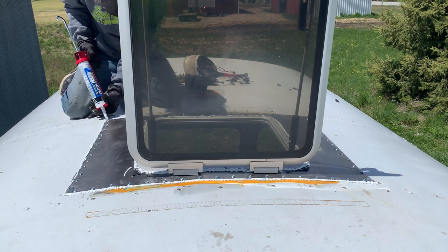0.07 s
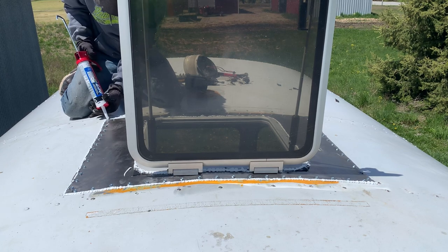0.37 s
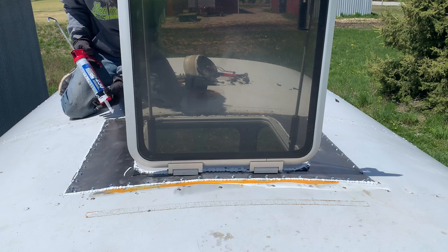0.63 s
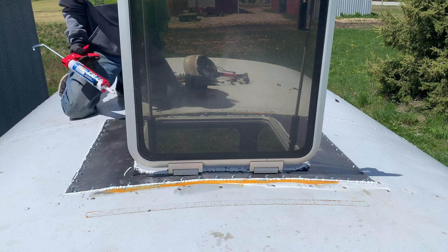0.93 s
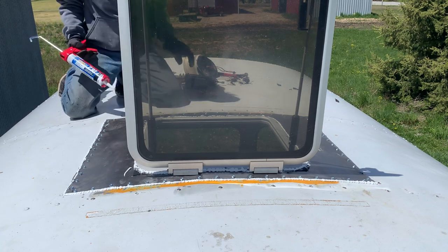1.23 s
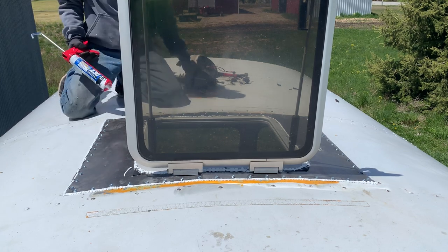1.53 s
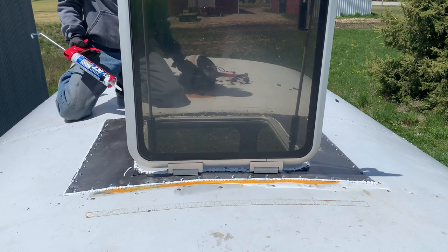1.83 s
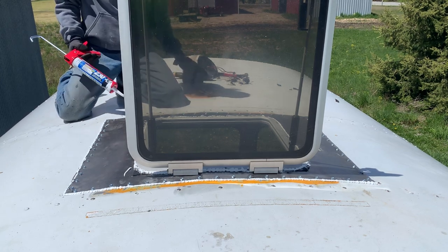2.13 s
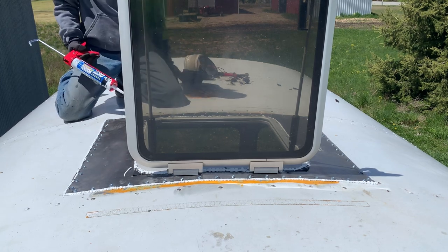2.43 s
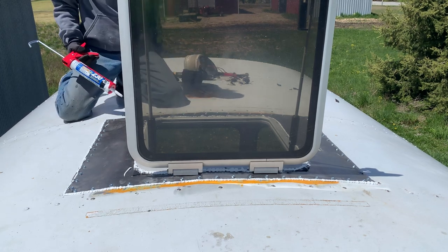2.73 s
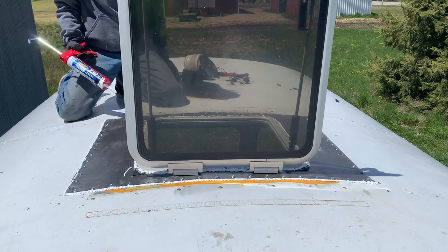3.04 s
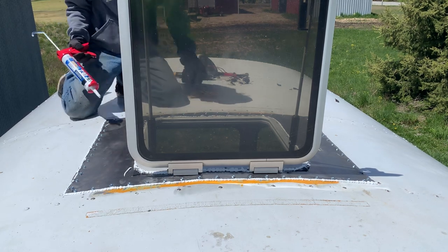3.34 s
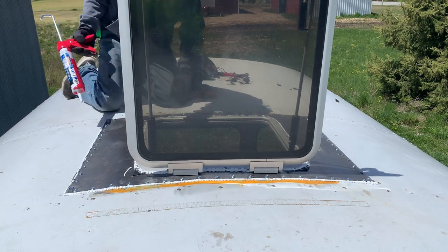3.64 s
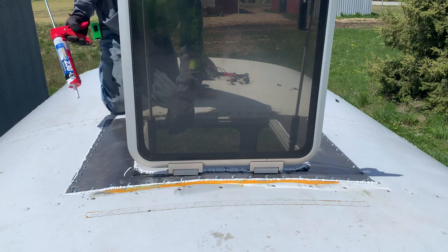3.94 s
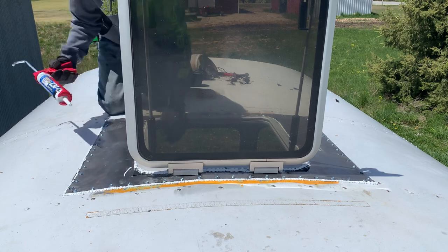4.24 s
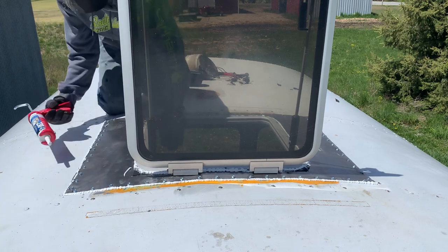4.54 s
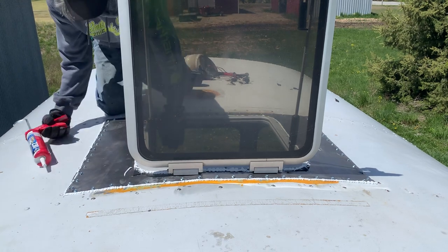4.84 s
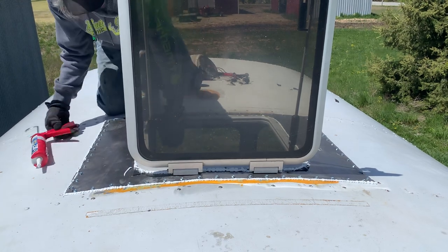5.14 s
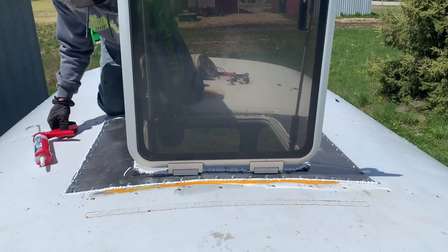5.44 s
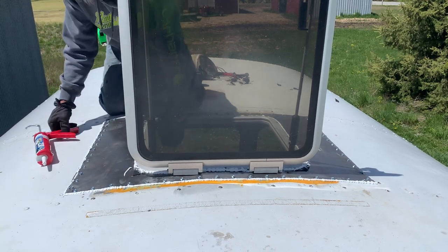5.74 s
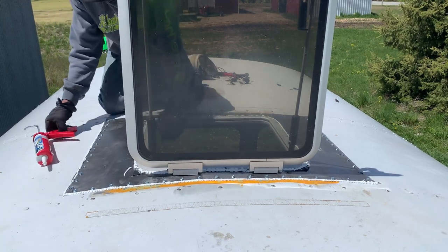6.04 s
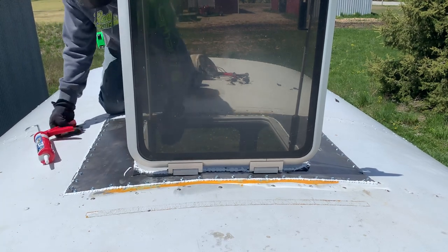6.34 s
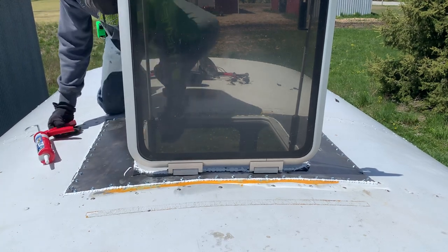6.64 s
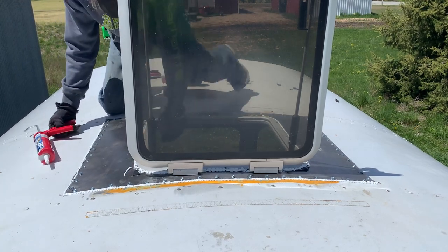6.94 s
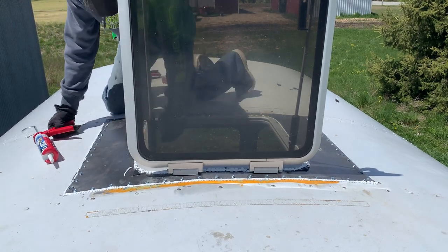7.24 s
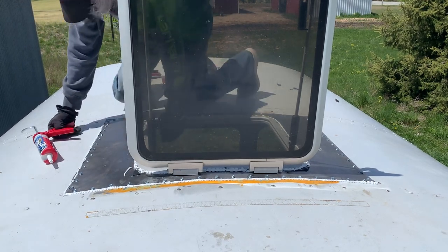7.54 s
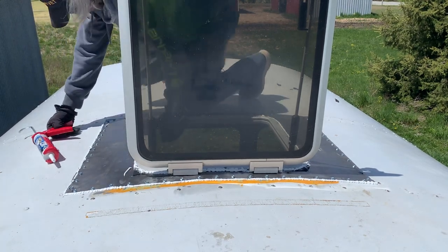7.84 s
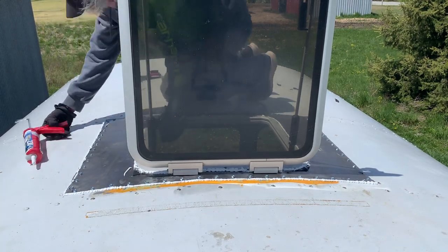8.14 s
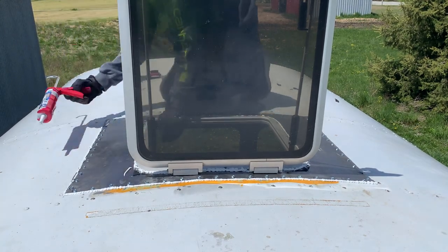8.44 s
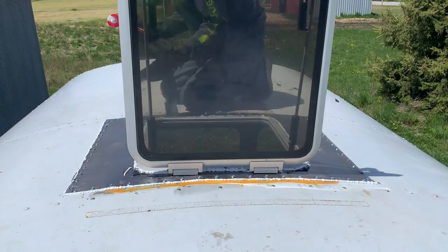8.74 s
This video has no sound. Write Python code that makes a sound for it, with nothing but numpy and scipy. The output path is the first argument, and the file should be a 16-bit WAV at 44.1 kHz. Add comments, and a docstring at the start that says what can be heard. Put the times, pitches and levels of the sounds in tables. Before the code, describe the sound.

A hand rubs a sheet-metal roof, knees thump on it, and a caulking gun clatters down, with faint birds outdoors.

```python
"""A hand rubs back and forth on a curved sheet-metal roof, hissing and setting the sheet humming.
Outdoors, a closely spaced microphone pair near the work. The person kneeling there shifts along:
knees and boots make the roof boom, panels flex and snap, legs drag and work clothes rustle.
A caulking gun clatters down on the sheet, its steel frame ringing and its loose rod ticking.
Far off, birds call among trees and a faint rush swells and fades."""
import sys
import numpy as np
from scipy import signal
from scipy.fft import rfft, irfft, next_fast_len
from scipy.io import wavfile

SR = 44100
rng = np.random.default_rng(int(sys.argv[2]) if len(sys.argv) > 2 else 0)


def dump(signal):
    """Clip the signal to [-1, 1] and save it as 16-bit WAV at the path in sys.argv[1]."""
    limited = np.clip(np.atleast_2d(signal).T, -1, 1)
    pcm = np.round(limited * 32767).astype(np.int16)
    wavfile.write(sys.argv[1], SR, pcm)


N = 392049
TIME = np.arange(N) / SR

# The hand pulls and pushes in turn. Each row: start and end in seconds, hiss in dB,
# tilt in dB per octave, hum in dB.
STROKES = [(-.28, .03, -42, 1.2, -33), (0.028, 0.338, -39.5, 1.4, -33), (0.341, 0.653, -40, 1.4, -37.5),
           (.645, 0.951, -39.5, 1.5, -32), (0.953, 1.269, -40.5, 1.24, -37), (1.264, 1.568, -39.5, 1, -32),
           (1.57, 2.018, -40.5, 1.2, -34.5)]
# Colour of sliding on the sheet. Each row: frequency in Hz, density in dB.
FRICTION = [(100, -16), (350, 8), (600, 1), (1000, -1), (2000, -3), (2900, -11.5), (4500, -13), (6000, -18),
            (7500, -17.5), (11000, -20), (13500, -12.5), (16000, -28.5)]
# The caulking gun hits the roof. Each row: time in seconds, boom in dB, contact cut-off in Hz, extra bass
# in dB, panel pitch in Hz, click in dB, click tilt in dB per octave, frame's favoured pitch in Hz.
KNOCKS = [(4.840, -19, 1320, -6, 438, -22, 3.5, 4540), (4.931, -26.5, 740, -1.5, 414, -28.5, 1, 3320),
          (4.998, -25, 740, -2.5, 220, -29.5, 2, 3300), (5.093, -19.5, 800, -7.5, 580, -22, 4.5, 3500),
          (5.205, -25, 800, 0, 330, -33, 0, 3800), (8.443, -44.5, 905, -1, 490, -50.5, -11, 3400)]


def from_db(db):
    """Decibels to gain."""
    return 10 ** (np.asarray(db) / 20)


def rms_one(x):
    """Scale to unit rms."""
    return x / np.sqrt(np.mean(x ** 2) + 1e-20)


def at_hz(points, hz):
    """Read a table on a log-frequency axis."""
    f, value = np.transpose(points)
    return np.interp(np.log(np.maximum(hz, 1)), np.log(f), value)


def bump(hz, centre_hz, octaves):
    """A bell curve of height 1 around a pitch."""
    return np.exp(-(np.log2(hz / centre_hz) / octaves) ** 2)


def add(out, s, sound):
    """Mix a sound in from s seconds on."""
    start = round(s * SR)
    first, last = max(start, 0), min(start + sound.shape[-1], N)
    out[:, first:last] += sound[..., first - start:last - start]


def noise(colour, size, tilt=0):
    """Two unrelated noises (shared and scattered sound), rms 1; tilt is dB per octave above 500 Hz."""
    padded = next_fast_len(size)
    hz = np.maximum(np.fft.rfftfreq(padded, 1 / SR), 1)
    gain = from_db(at_hz(colour, hz) + tilt * np.log2(np.maximum(hz, 500) / 500)) * (hz > 15)
    return rms_one(irfft(rfft(rng.standard_normal((2, padded))) * gain, padded)[:, :size])


def drift(rate, size):
    """A random wander with `rate` turns a second, spread near 1."""
    knots = rng.standard_normal(int(size / SR * rate) + 2)
    return np.interp(np.arange(size) / SR * rate, np.arange(len(knots)), knots)


def stroke_speed(size):
    """The hand picks up speed quickly, levels off in mid-stroke and slows."""
    return np.tanh(1.25 * np.abs(np.sin(np.linspace(0, np.pi, size))))


def limb_speed(size):
    """A limb eases into a move and out of it."""
    return np.sin(np.linspace(0, np.pi, size)) ** 2


def sliding(moves, speed_curve, colour, grit_db, uneven_db, swell, dull_db, dull_hz):
    """Sliding contact: the hiss grows louder and brighter with speed."""
    out = np.zeros((2, N))
    for start, end, db, tilt, *_ in moves:
        size = round((end - start) * SR)
        speed = speed_curve(size)
        hiss = noise(colour, size, tilt)
        hiss *= from_db(grit_db * drift(400, size) + uneven_db * drift(49.1, size))
        dull = from_db(dull_db) * signal.sosfilt(signal.butter(2, dull_hz, fs=SR, output="sos"), hiss)
        creeping = (1 - speed) * np.minimum(speed * 10, 1)
        add(out, start, from_db(db) * (hiss * speed ** swell + dull * creeping))
    return out


def rubbing_hand():
    """Friction under the hand gives an even hiss on each stroke."""
    return sliding(STROKES, stroke_speed, FRICTION,
                   grit_db=0.5, uneven_db=1, swell=1.25, dull_db=-7.5, dull_hz=2780)


def sheet_hum(t60=0.3):
    """Each stroke sets the sheet humming, and the hum lingers; body weight makes it rumble."""
    # Colours of hum and rumble. Each row: frequency in Hz, density in dB.
    hum_colour = [(70, -82), (120, -2), (170, 6.5), (270, -0.5), (390, 0.5), (500, -14.5), (900, -20),
                  (2000, -38.5), (5000, -39), (10000, -53)]
    rumble_colour = [(20, -30), (40, 16), (65, 16.5), (110, 15.5), (160, -22), (400, -67.5)]
    # Weight shifting onto the sheet. Each row: time in seconds, rumble in dB.
    weight = [(0, -48.5), (1.4, -56), (1.6, -37), (1.88, -32.5), (2.1, -33), (2.6, -69)]
    drive = np.zeros((1, N))
    for start, end, _, _, db in STROKES:
        add(drive, start, from_db(db) * stroke_speed(round((end - start) * SR)) ** 0.24)
    retained = from_db(-60 / (t60 * SR)) ** 2   # share of energy left after one sample
    hum = np.sqrt(signal.lfilter([1 - retained], [1, -retained], drive ** 2 + 1e-18))
    rumble = from_db(np.interp(TIME, *np.transpose(weight)))
    return hum * noise(hum_colour, N) + rumble * noise(rumble_colour, N)


def open_air(air_db=-50, rush_db=-60, peak_s=3.96, width_s=1.47):
    """Quiet air stirred by a breeze; a far rush, perhaps traffic, swells and fades."""
    # Colours of air and rush. Each row: frequency in Hz, density in dB.
    air_colour = [(15, -46), (25, -23.5), (66, 3), (153, -12.5), (223, -8), (373, -18.5), (516, -19.5),
                  (1160, -31.5), (1890, -41), (2990, -45), (7110, -56), (8140, -58), (11600, -54.5),
                  (16000, -73.5)]
    rush_colour = [(300, -25.5), (600, 4.5), (900, 7), (1300, -4), (2000, -14.5), (4000, -60)]
    breeze = from_db(air_db + 1.5 * drift(6, N)) * noise(air_colour, N)
    swell = 1 / (1 + ((TIME - peak_s) / width_s) ** 2)
    return breeze + from_db(rush_db) * swell * noise(rush_colour, N)


def call_and_squeak_notes(trill_hz=58, chirp_from_hz=2600, twitters_per_s=16, blur=0.025):
    """Yield each note as start in seconds, level in dB, pitch blur in Hz, rasp, pitch track in Hz."""
    # Birds' gliding whistles. Each row: start and length in seconds, first, middle and last pitch in Hz,
    # level in dB, rasp as a share of the pure tone.
    whistles = [(3.877, 0.069, 2090, 2250, 2240, -69, .3), (4.032, 0.067, 2330, 2110, 1950, -72, .3),
                (4.358, 0.15, 2250, 2430, 2740, -67.5, .5), (4.52, 0.15, 2600, 2240, 2080, -66, 0.44),
                (4.672, 0.098, 2150, 2310, 2600, -70, .4), (5.252, .25, 1020, 1179, 1028, -55, 1.5),
                (5.345, 0.12, 2200, 2460, 2870, -65, 0.44), (5.485, 0.15, 2600, 2380, 2170, -71, .4),
                (5.69, 0.049, 2280, 2430, 2650, -72, .4), (6.135, 0.16, 3010, 2350, 2214, -71, 0.63),
                (6.33, 0.04, 2230, 2420, 2800, -69, .4)]
    for start, length, first, middle, last, db, rasp in whistles:
        arc = np.polyfit([-1, 0, 1], [first, middle, last], 2)
        yield start, db, blur * middle, rasp, np.polyval(arc, np.linspace(-1, 1, round(length * SR)))
    # Falling trills. Each row: start and length in seconds, first and last pitch in Hz, level in dB.
    trills = [(6.596, 0.13, 5220, 4470, -70), (6.698, .19, 4410, 4020, -69), (7.6, .19, 6640, 4770, -75),
              (7.778, 0.17, 4440, 4040, -67.5)]
    for start, length, first, last, db in trills:
        t = TIME[:round(length * SR)]
        vibrato = 1 + 0.025 * np.sin(2 * np.pi * trill_hz * t)
        yield start, db, 35, 0, np.geomspace(first, last, len(t)) * vibrato
    # Raspy chirps flick up and hold. Each row: start and length in seconds, top pitch in Hz, level in dB.
    chirps = [(2.441, 0.054, 3750, -63), (3.266, 0.043, 3750, -62), (3.83, 0.048, 4000, -70),
              (5.584, 0.059, 3750, -63), (6.6, 0.037, 3700, -62.5), (7.864, 0.037, 3850, -59),
              (8.556, 0.04, 3750, -63), (8.839, 0.052, 3800, -62)]
    for start, length, hz, db in chirps:
        flick = (chirp_from_hz - hz) * np.exp(-TIME[:round(length * SR)] / 0.009)
        yield start, db, 300, 4, hz + flick
    # Steady calls, a thin squeak and a dragging leg's rasp. Each row: start and end in seconds,
    # pitch in Hz, level in dB, blur in Hz.
    held_notes = [(0.292, 0.352, 1974, -47.5, 58), (2.95, 3.07, 5650, -75.5, 29),
                  (3.112, 3.253, 5600, -80.5, 28), (3.02, 3.093, 2760, -66, 230),
                  (7.745, 7.895, 533.7, -56, 7.9), (7.979, 8.3, 3300, -61, 360),
                  (8.322, 8.421, 2210, -59, 300)]
    for start, end, hz, db, blur_hz in held_notes:
        yield start, db, blur_hz, 0, np.full(round((end - start) * SR), hz)
    # Fainter birds twitter at random.
    for start in rng.uniform(0, N / SR, round(twitters_per_s * N / SR)):
        slope = 0.12 * rng.uniform(-1.5, 1)
        glide = 1 + slope * np.linspace(-1, 1, round(rng.uniform(0.02, 0.05) * SR))
        hz = rng.uniform(2300, 3900)
        yield start, rng.normal(-81, 2), blur * hz, 0, hz * glide


def calls_and_squeaks(warble=0.005, fading_db=2.5, trees_t60=0.42, trees_db=-1):
    """Far bird calls, plus a thin squeak and a leg's rasp on the roof, waver and echo among the trees."""
    out = np.zeros((2, N))
    for start, db, blur_hz, rasp, track in call_and_squeak_notes():
        size = len(track)
        hz = track * (1 + warble * drift(60, size)) + blur_hz * drift(400, size)
        tone = np.sin(2 * np.pi * np.cumsum(hz) / SR)
        flutter = 1 + rasp * drift(0.25 * hz.mean(), size)   # rasp spreads the note around its pitch
        note = rms_one(tone * flutter * from_db(fading_db * drift(31, size)))
        add(out, start, from_db(db) * note * signal.windows.tukey(size, 0.4))
    t = TIME[:SR // 2]
    trees = rng.standard_normal((2, len(t))) * from_db(-60 * t / trees_t60)
    trees *= from_db(trees_db) / np.linalg.norm(trees, axis=1, keepdims=True)
    return (out + signal.fftconvolve(out, trees, axes=1)[:, :N]) / np.hypot(1, from_db(trees_db))


def caulking_gun(crack_t60=0.021, rattle_t60=0.2, linger_t60=0.26, chatter_db=3.5, rattle_tilt=-3.8):
    """Each steel click is a short crack, the frame's ring and an after-rattle that keeps it ringing."""
    # The loose rod and trigger tick and rebound. Each row: time in seconds, level in dB,
    # tilt in dB per octave, frame's favoured pitch in Hz.
    ticks = [(0.307, -37, 2, 10200), (1.277, -47, -4, 3800), (2.060, -44, 0, 6270), (2.115, -37, -13, 6550),
             (2.122, -38, -6, 6500), (2.139, -43, 12, 3200), (2.263, -42.5, -5, 6400),
             (2.277, -49, -7, 3800), (2.337, -34.5, 5, 14000), (2.353, -44.5, -6, 10200),
             (3.954, -58, 3, 3200), (3.968, -55.5, 1, 3200), (4.206, -39, 6, 13600), (4.218, -36, 4, 13700),
             (4.853, -37, 9, 10000), (4.950, -48, 8, 3300), (5.015, -48, -3, 3300), (5.021, -40, 3, 3300),
             (5.032, -50, -4, 3800), (5.113, -30, 0, 9900), (5.125, -35, -1, 3800), (5.142, -39, 5, 3800),
             (5.163, -40.5, 2, 3900), (5.170, -38, -1, 6200), (5.208, -35, 3.5, 9900),
             (5.222, -49, -4, 3800), (5.233, -52, 0, 3770), (7.582, -47.5, 2.5, 3800),
             (7.598, -45, 2, 3820), (8.399, -61, 2, 4690), (8.406, -55, 0, 4700), (8.414, -55, -2, 6570),
             (8.528, -59.5, 1, 6400), (8.801, -59, -9, 4730)]
    # The frame's modes. Each row: frequency in Hz, level in dB, 60 dB decay time in seconds.
    frame = [(2080, -6, 0.017), (2280, 1.5, 0.037), (2860, -1, 0.033), (3160, -0.5, 0.02),
             (3420, -4, 0.021), (3855, -3, 0.018), (4200, -4.5, 0.014), (4710, -6.5, 0.018),
             (6320, -11.5, 0.016), (6710, -8.5, 0.018), (7400, -3, 0.015), (9500, 4.5, .014),
             (9670, -0.5, 0.0098), (10230, -5, 0.012), (11220, -7.5, 0.015), (13900, 0.5, .012),
             (15000, -9, .012)]
    # Colour of a steel contact. Each row: frequency in Hz, density in dB.
    steel = [(300, -17), (1000, 9.5), (2200, 4), (3400, -5.5), (4700, 1), (6200, 0.5), (8000, -9),
             (10200, -5), (12300, -8), (15200, -11)]
    out, size = np.zeros((2, N)), SR // 4
    t = TIME[:size]
    hz, mode_db, mode_t60 = np.transpose(frame)
    decay = from_db(-60 * t / mode_t60[:, None]) + from_db(-36 - 60 * t / linger_t60)
    modes = np.exp(2j * np.pi * hz[:, None] * t) * decay
    crack_decay = from_db(-60 * t / crack_t60)
    knocks = [(s, db, tilt, spot_hz) for s, *_, db, tilt, spot_hz in KNOCKS]
    for s, db, tilt, spot_hz in knocks + ticks:
        chatter = from_db(chatter_db * drift(810, size))
        crack = rms_one(crack_decay * chatter * noise(steel, size, tilt))
        crack *= np.sqrt(np.mean(crack_decay ** 2))   # chatter only redistributes the energy
        spot_db = 13.5 * bump(hz, spot_hz, octaves=0.22)   # the struck spot favours some modes
        strength = from_db(mode_db + spot_db + tilt * np.log2(hz) + rng.normal(0, 2, (2, len(hz))))
        phases = np.exp(2j * np.pi * rng.random(strength.shape))
        ring = (strength / np.linalg.norm(strength) * phases @ modes).real
        jingle = rms_one(signal.fftconvolve(noise(steel, size, rattle_tilt), ring, axes=1)[:, :size])
        rattle_gain = from_db(-24.5 - 60 * t / rattle_t60 + chatter_db * drift(180, size))
        rattle = rattle_gain * (noise(steel, size, tilt + rattle_tilt) + from_db(4) * jingle)
        add(out, s, from_db(db) * (from_db(-7) * crack + rattle + from_db(4.5) * ring))
    return out


def panel_flexes():
    """A panel gives way and springs back within a few cycles."""
    # Each row: centre time in seconds, peak in dB, pitch in Hz, half-length in cycles.
    flexes = [(0.42, -37, 73, 1.1), (1.061, -21.5, 88, 0.72), (1.265, -31.5, 72, 0.89),
              (2.615, -16, 97, 0.64), (2.785, -29, 72.4, 0.94), (2.843, -31, 62.7, 0.52),
              (4.234, -12.5, 80, 1.3), (4.286, -17.5, 180, 2.9), (4.863, -16.5, 157, 2.2),
              (4.948, -17, 136, 1.46), (5.118, -16, 114, 3.6), (7.019, -20, 233, 1.3),
              (7.385, -30, 73.5, 0.56)]
    out = np.zeros((2, N))
    for s, db, hz, cycles in flexes:
        turns = (TIME - s) * hz
        out[0] -= from_db(db) * np.cos(2 * np.pi * turns) * np.exp(-(turns / cycles) ** 2)
    return out


def dragging_legs():
    """A leg drags over the roof with a gritty scrape."""
    # Each row: start and end in seconds, level in dB, tilt in dB per octave.
    drags = [(1.88, 2.2, -43.5, -5.5), (2.54, 2.63, -50.5, -5), (2.77, 2.84, -49, -5.5),
             (2.88, 2.95, -53.5, -4.5), (7.94, 8.36, -45.5, -7.5), (8.08, 8.48, -48.5, -4.5)]
    return sliding(drags, limb_speed, FRICTION,
                   grit_db=3, uneven_db=-1.5, swell=0.82, dull_db=-29, dull_hz=2700)


def shifting_folds(cloth, wander_db=2.5):
    """Folds keep changing, so each treble band waxes and wanes by itself over a steady low part."""
    size = next_fast_len(N)
    hz, spectrum = np.fft.rfftfreq(size, 1 / SR), rfft(cloth, size)
    centres = np.geomspace(900, 12000, 12)
    out = cloth.copy()
    for pick in np.eye(len(centres))[1:]:
        band = irfft(spectrum * np.interp(hz, centres, pick), size)[:, :N]
        out += band * (from_db(wander_db * drift(18, N)) - 1)
    return out


def contact_gain(hz, soft_hz, bass_db, panel_hz, panel_db, hollow_db):
    """Weight feeds the bass, the struck panel favours its own pitch, a soft contact loses the top."""
    weight = bass_db / (1 + (hz / 113) ** 4)
    panel = panel_db * bump(hz, panel_hz, octaves=0.29)
    hollow = hollow_db * bump(hz, 496, octaves=0.62)   # the gun's knocks sound slightly hollow
    return from_db(weight + panel + hollow) / (1 + (hz / soft_hz) ** 2)


def roof_booms(bloom_t60=0.43, tail_db=-3.5, lag_cycles=0.95, knock_rise_s=0.00088, detune=0.01):
    """Knees, boots and the gun ring the sheet: a quick bloom near the contact, then a long low tail."""
    # Knees and boots land. Each row: time in seconds, level in dB, contact cut-off in Hz,
    # extra bass in dB, panel pitch in Hz, rise in seconds.
    blows = [(1.888, -30.5, 1220, 8, 895, 0.0074), (2.066, -29.5, 1970, -6, 884, 0.0073),
             (2.115, -23, 1900, 1.5, 420, 0.01), (2.185, -27.5, 860, 4.5, 390, 0.0087),
             (2.261, -33, 2000, -24, 413, .006), (2.891, -48, 1400, 5, 1023, 0.0034),
             (3.308, -35.5, 252, 5.5, 150, .012), (3.339, -30.5, 1420, 4.5, 170, .014),
             (3.959, -42.5, 90, 17.5, 78, .01), (4.170, -20, 357, 2.5, 260, 0.0095),
             (4.198, -22.5, 1410, -0.5, 220, 0.011), (4.385, -40, 200, 9, 117, 0.0069),
             (5.138, -25.5, 500, -5.5, 320, 0.0043), (5.555, -32, 302, -1.5, 218, 0.0094),
             (6.23, -38.5, 306, -1, 166.4, 0.016), (6.579, -36.5, 238.5, 4.5, 108, .012),
             (6.988, -34.5, 453, -2, 326, 0.0046), (7.008, -24.5, 330, -2.5, 270, 0.0076),
             (7.03, -40, 1200, 14, 150, 0.018), (8.015, -35.5, 493, 7, 196, 0.0068),
             (8.169, -38.5, 500, -1.5, 150, 0.012)]
    # The roof's strong modes. Each row: frequency in Hz, level in dB, 60 dB decay time in seconds.
    strong_modes = [(45.2, -24, 1.6), (55.54, -24.5, 2.6), (71.94, -11.5, 0.96), (96, -20.5, 0.74),
                    (115.2, -5.5, 0.77), (155.3, -14, 0.86), (182, -10, 1.22), (218.4, -9.5, 1.27),
                    (287, -12.5, 0.38), (335, -10.5, 0.66), (417.3, -13, 0.52), (566, -11, 0.3),
                    (720, -38, 0.34), (755, -20, 0.31), (1030, -22.5, 0.39), (1970, -41, .2)]
    # Its dense lesser modes. Each row: frequency in Hz, density in dB.
    sheet_colour = [(25, -32), (45, -0.5), (80, 1), (130, -3), (230, -1.5), (380, -10), (700, -10.5),
                    (1400, -15), (3000, -18.5), (6000, -43.5), (15000, -19)]
    # How long those ring. Each row: frequency in Hz, 60 dB decay time in seconds.
    sheet_t60 = [(50, 3.36), (120, 2.8), (240, 1.26), (400, 0.69), (1000, 0.21), (3000, 0.24),
                 (12000, 0.19)]
    t = TIME[:2 * SR]
    edges = 28 * 2 ** (np.arange(19) / 2)   # half-octave noise bands stand for the dense modes
    centres = np.sqrt(edges[1:] * edges[:-1])
    white = rng.standard_normal((2, 2, 3 * len(t)))
    filters = [signal.butter(2, band, "band", fs=SR, output="sos") for band in zip(edges, edges[1:])]
    bands = np.array([rms_one(signal.sosfilt(sos, white[k % 2])) for k, sos in enumerate(filters)])
    share = from_db(at_hz(sheet_colour, centres)) * np.sqrt(centres)
    share /= np.linalg.norm(share)
    tail = from_db(tail_db - 60 * t / at_hz(sheet_t60, centres)[:, None])
    arrival = 1 - np.exp(-t * centres[:, None] / lag_cycles)   # slow bending waves bring the bass late
    envelopes = (from_db(-60 * t / bloom_t60) + tail) * arrival
    mode_hz, mode_db, mode_t60 = np.transpose(strong_modes)
    modes = np.exp(2j * np.pi * mode_hz[:, None] * t)
    modes *= from_db(mode_db[:, None] - 1 - 60 * t / mode_t60[:, None])
    contacts = [(*blow, 4, 0) for blow in blows]   # the last two are panel and hollow in dB
    contacts += [(*knock[:5], knock_rise_s, 9.5, -2.5) for knock in KNOCKS]
    out = np.zeros((2, N))
    for s, db, soft_hz, bass_db, panel_hz, rise, panel_db, hollow_db in contacts:
        touch = soft_hz, bass_db, panel_hz, panel_db, hollow_db
        offset = int(rng.uniform(0.1, 1.9) * len(t))
        band_gains = share * contact_gain(centres, *touch)
        dense = np.einsum("b,bcn,bn->cn", band_gains, bands[:, :, offset:offset + len(t)], envelopes)
        phases = np.exp(2j * np.pi * rng.random((2, len(mode_hz))))
        strong = (contact_gain(mode_hz, *touch) * phases @ modes).real
        tuning = 1 + detune * rng.uniform(-1, 1)   # shifting weight retunes the sheet a little
        strong = np.array([np.interp(t * tuning, t, wave) for wave in strong])
        purity = from_db(3.5 * np.exp(-rise / 0.0078))   # a hard, quick contact favours strong modes
        attack = 1 - np.exp(-(t / rise) ** 2)
        add(out, s, from_db(db) * attack * (dense / purity + strong * purity))
    return out


def work_clothes():
    """Cloth brushes on cloth as the limbs move."""
    # Each row: start and end in seconds, level in dB, tilt in dB per octave.
    rustles = [(2.36, 2.72, -58, -5.5), (2.56, 2.65, -65, -1), (2.64, 2.84, -61.5, -3),
               (2.86, 2.97, -58, -3), (3.24, 3.66, -59, 1.5), (3.52, 3.97, -55, 8), (5.18, 5.5, -68, 8),
               (5.44, 5.6, -62.5, 3), (5.9, 6.04, -74, 6), (6.04, 6.4, -73.5, 1.5), (6.4, 6.62, -54, 8.5),
               (6.49, 6.65, -57.5, 0.5), (6.68, 6.83, -65, -0.5), (6.95, 7.15, -52.5, -6),
               (7.1, 7.34, -63.5, -4.5), (7.38, 7.5, -68, -0.5), (7.49, 7.56, -60, -5), (7.9, 8.36, -56, 1),
               (8.35, 8.43, -62, -0.5), (8.6, 8.8, -69.5, -5)]
    # Colour of the cloth. Each row: frequency in Hz, density in dB.
    cloth = [(200, 0.5), (800, 12), (1900, 7.5), (2600, 12), (3300, 5), (4500, 2), (7000, -2),
             (11000, -4.5), (16000, -6.5)]
    return sliding(rustles, limb_speed, cloth,
                   grit_db=3, uneven_db=0.6, swell=0.64, dull_db=-6.5, dull_hz=3080)


def sheet_pings():
    """High bending waves run faster, so each snap of the sheet arrives as a quick falling sweep."""
    # Each row: start and length in seconds, first and last pitch in Hz, peak in dB.
    snaps = [(2.784, 0.017, 905, 420, -48), (8.442, 0.016, 1103, 129, -40.5),
             (8.456, 0.0046, 2480, 1770, -35.5), (8.459, 0.0091, 5600, 3030, -59)]
    out = np.zeros((2, N))
    for s, length, first_hz, last_hz, db in snaps:
        size = round(length * SR)
        sweep = np.sin(2 * np.pi * np.cumsum(np.geomspace(first_hz, last_hz, size)) / SR)
        add(out[:1], s, from_db(db) * sweep * signal.windows.tukey(size, 0.5))
    return out


def near_echoes(x, lowest_hz=580):
    """The roof and an open glass hatch nearby throw back the waves that are short enough."""
    # Each row: delay in seconds, level in dB.
    reflections = [(.0017, -46), (.0043, -36.5), (.0083, -15.5), (0.0144, -16.5), (0.0172, -20),
                   (.031, -28.5)]
    short_waves = signal.sosfilt(signal.butter(1, lowest_hz, "high", fs=SR, output="sos"), x)
    out = x.copy()
    for delay, db in reflections:
        add(out, delay, from_db(db) * short_waves)
    return out


def microphone_pair(x):
    """Shared and scattered sound reach two close microphones, differing in phase and level."""
    # Each row: frequency in Hz, likeness of left and right from 0 to 1.
    likeness = [(50, .72), (130, .92), (300, .88), (700, .7), (2000, .55), (6000, .55), (8400, .95),
                (15000, .97)]
    # Each row: frequency in Hz, phase lead of the left in radians.
    lead = [(30, 0), (250, .2), (700, .95), (1300, 1.6), (2700, 3.5), (4600, 6.2), (5800, 7.8), (7000, 5.2),
            (8200, 3.3), (9000, 2.9), (10500, .1), (11600, -.1), (13100, -3), (14000, -3.3), (15200, -6.1)]
    # Each row: frequency in Hz, left minus right in dB.
    balance = [(60, 0.2), (250, -0.6), (400, 0.5), (650, 2.5), (1100, 1.5), (2200, 0.3), (5000, -1.5),
               (10000, 0)]
    hz = np.fft.rfftfreq(next_fast_len(N + 2000), 1 / SR)
    size = 2 * (len(hz) - 1)
    shared, scattered = rfft(x, size)
    alike = at_hz(likeness, hz)
    mid, side = shared * np.sqrt((1 + alike) / 2), scattered * np.sqrt((1 - alike) / 2)
    leftward = from_db(at_hz(balance, hz) / 2) * np.exp(0.5j * at_hz(lead, hz))
    return irfft(np.array([(mid + side) * leftward, (mid - side) / leftward]), size)[:, :N]


def scene():
    """Work on the roof close to the microphones, open air around it, birds in the distance."""
    rubbing = rubbing_hand() + sheet_hum()
    cloth = dragging_legs() + work_clothes()
    metal = roof_booms() + panel_flexes() + sheet_pings() + caulking_gun()
    rooftop = near_echoes(rubbing + shifting_folds(cloth) + metal + open_air())
    return microphone_pair(rooftop + calls_and_squeaks())


def record(dry):
    """The treble is cut steeply above 15.9 kHz."""
    return signal.sosfilt(signal.ellip(10, 0.2, 80, 15900, fs=SR, output="sos"), dry)


dry = scene()
out = record(dry)
dump(out)
```